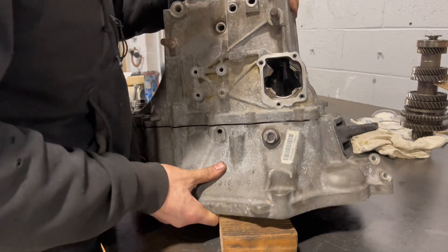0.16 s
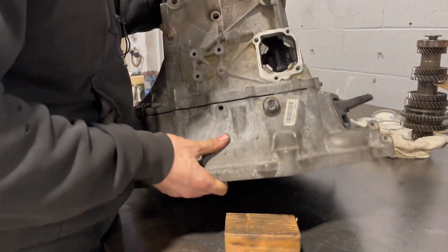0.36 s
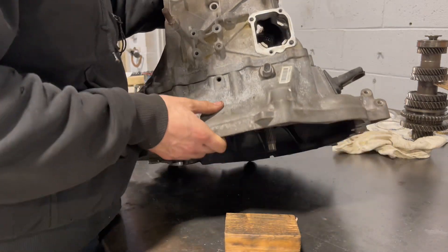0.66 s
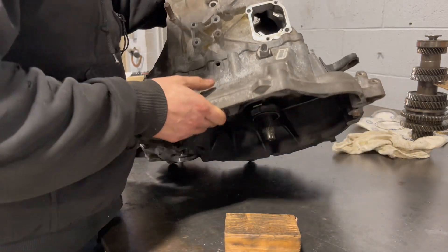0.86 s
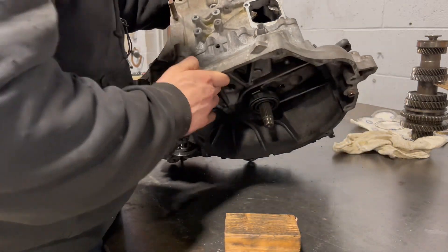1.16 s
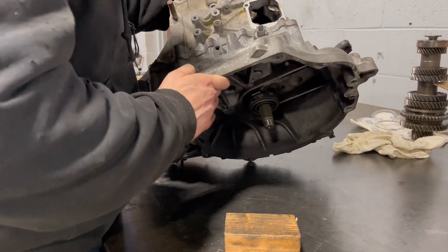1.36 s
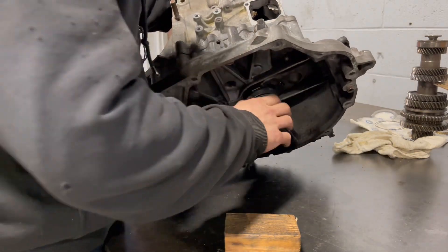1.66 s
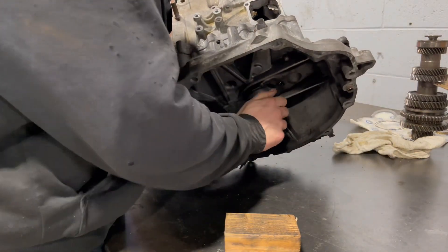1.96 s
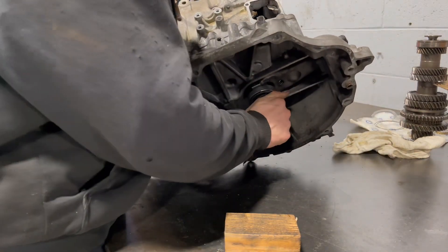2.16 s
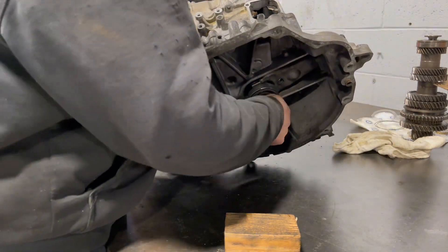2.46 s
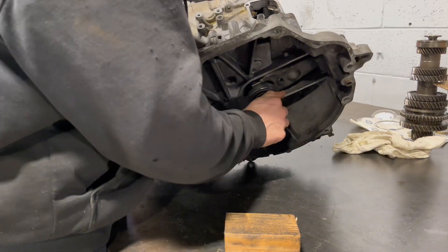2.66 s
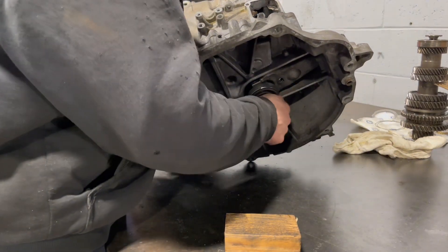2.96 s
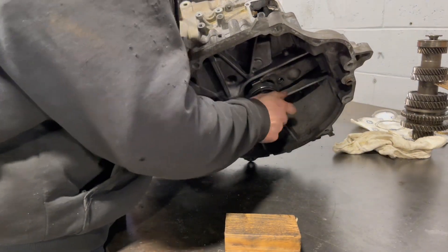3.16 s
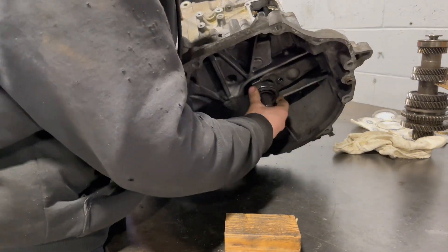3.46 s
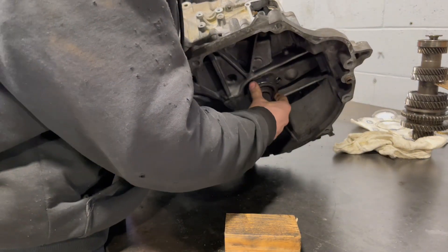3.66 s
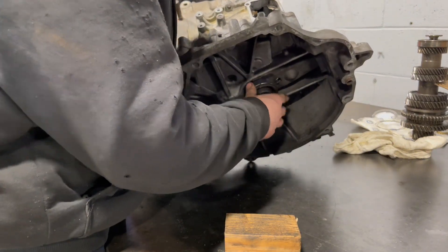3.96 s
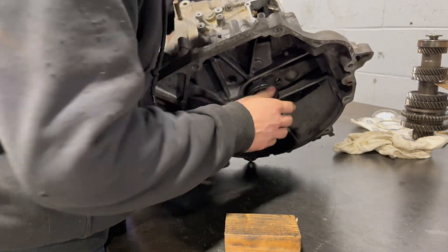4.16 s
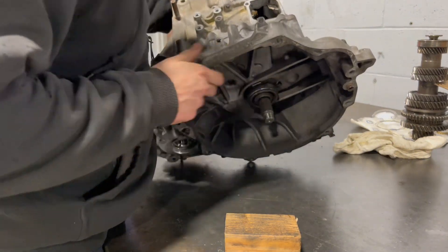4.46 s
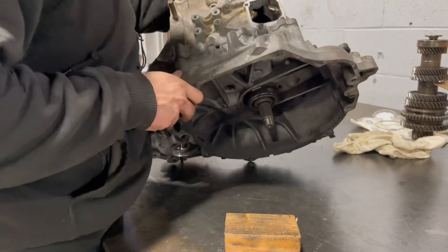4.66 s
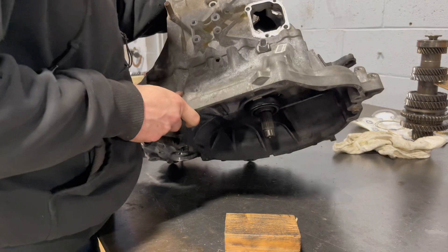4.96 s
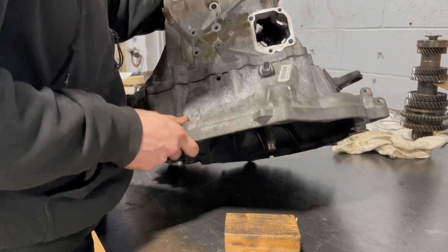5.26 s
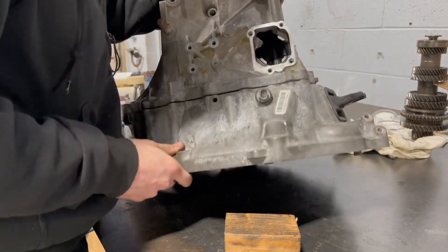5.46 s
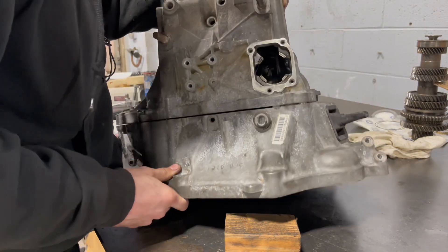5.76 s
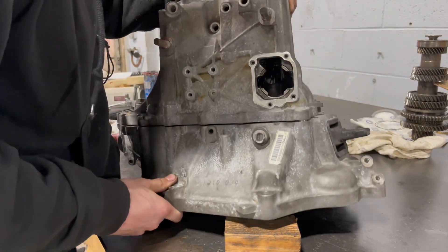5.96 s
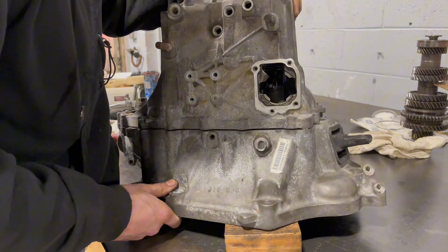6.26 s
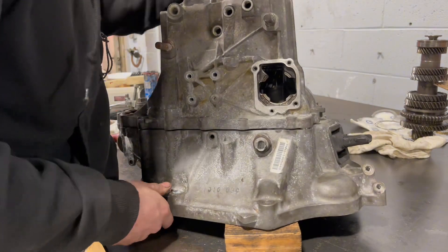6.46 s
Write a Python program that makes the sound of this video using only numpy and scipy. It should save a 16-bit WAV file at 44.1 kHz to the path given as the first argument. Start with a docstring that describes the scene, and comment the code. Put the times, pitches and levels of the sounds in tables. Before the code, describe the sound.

A heavy hollow metal casing thumps onto a bench, small gear clicks and a faint steel chink follow, then softer deep thuds as it is set back.

```python
"""A heavy cast gearbox case is tipped over on a steel workbench, and later tipped back onto a wooden block.
Each bump excites decaying modes of bench and shell and bursts of noise at the contact; rolling is rubbed modes.
In between a hand twists the input shaft: gears click as noise bursts, loose steel rings as shaft modes.
Sleeves rustle as grainy filtered noise; a workshop hums as steady noise and echoes through random decaying tails.
Two microphone ports hear it all."""
import sys
import numpy as np
from scipy import signal
from scipy.fft import rfft, irfft, next_fast_len
from scipy.io import wavfile
from scipy.ndimage import map_coordinates

SR = 44100
rng = np.random.default_rng(int(sys.argv[2]) if len(sys.argv) > 2 else 0)


def unload_wav(signal):
    """Save mono or channel-first audio to the path in sys.argv[1] as 16-bit WAV at rate SR, clipped to [-1, 1]."""
    wavfile.write(
        sys.argv[1],
        SR,
        np.round(np.clip(np.atleast_2d(signal).T, -1, 1) * 32767).astype(np.int16),
    )


N = 291501

# Bumps of the case: (time [s], boom, knock, clack and grit levels [dB], drive of the upper bench modes [dB])
BUMPS = [(0.101, -54, -52.5, -49, -68, 9), (0.151, -44, -61, -70, -77, -5), (.285, -42, -51, -36.5, -53, 4),
         (0.3, -42, -42, -46, -50, 2), (.31, -13, -25.5, -20, -33, 6), (.317, -15, -22, -25, -30, -5),
         (.324, -27.5, -21, -30.5, -37.5, -7), (.333, -27, -30.5, -30.5, -38, -2),
         (0.341, -20.5, -46, -30, -42, 5.5), (0.348, -33, -49, -34, -35, -9),
         (0.364, -25, -34, -37, -41.5, 7.5), (1.053, -24.5, -32, -43, -66, 1.5),
         (1.064, -34.5, -37.5, -54.5, -78, -3), (1.076, -30.5, -39.5, -54.5, -72, 2),
         (4.785, -27.5, -34, -43.5, -62, 1), (4.796, -35, -37, -54, -67, 0),
         (4.813, -33.5, -50.5, -56, -71, 1.5), (5.365, -53, -60.5, -65, -81.5, 2),
         (5.4, -41.5, -49.5, -65.5, -72, -1.5), (5.44, -46, -56.5, -62.5, -78, 4.5),
         (5.75, -38, -41.5, -36, -68.5, 1), (5.761, -17, -34.5, -52, -81.5, -1),
         (5.812, -40, -35, -43, -66, -3), (5.83, -27.5, -37.5, -49.5, -64.5, -6),
         (5.872, -33.5, -38, -57, -70, 3), (6.055, -38, -55, -36, -62, -8),
         (6.063, -37, -47, -36, -44.5, -5), (6.075, -15.5, -35, -33.5, -42, 2.5),
         (6.087, -38, -40, -55, -47.5, 15), (6.098, -37, -43, -59, -63, 3),
         (6.108, -18.5, -33.5, -41.5, -54, -0.5), (6.149, -25.5, -32.5, -41, -55, 1),
         (6.158, -37, -44, -60, -58, -6), (6.218, -26.5, -38.5, -54, -74, -11),
         (6.277, -20.5, -46, -43, -51, -7.5), (6.425, -26, -41, -53, -61, -4.5),
         (6.511, -26.5, -53, -48.5, -77, -7), (6.569, -22, -57, -59, -66, -5)]
# Modes of the steel bench top: (frequency [Hz], level [dB], decay by 60 dB [s])
BENCH_MODES = [(53.2, -5, 1), (67.96, 2.5, 0.6), (71.48, 1, 1), (102, -3.5, 0.53), (124, -11.5, 0.18),
               (143.5, -6, 0.39)]
# Modes of the cast shell: (frequency [Hz], level [dB], decay by 60 dB [s])
CASE_MODES = [(169.6, 3, 0.043), (212.5, 1, 0.083), (255.5, 1.5, 0.065), (293.4, 5, 0.052),
              (343, -0.5, 0.053), (393.5, -7.5, 0.13), (440, -6, 0.15), (302.2, -22.5, 0.67),
              (561, -23, 0.79), (620, -13, 0.053), (735, -13, 0.3), (810, -16, 0.2), (890, -16.5, 0.11),
              (1194, -25, .2), (1360, -24, .3), (1460, -25, .2), (1718, -21.5, .18), (1940, -24, .3),
              (2290, -27, .3), (2460, -22, 0.14)]
# Contact noise, from dull to bright: (frequency [Hz], spectral density [dB per Hz])
THUD_SPECTRUM = [(140, -25.5), (300, -2.5), (600, -3), (900, -7), (1400, -29.5), (3000, -72.5)]
CLACK_SPECTRUM = [(300, -28), (500, 0), (850, 5.5), (1300, 4), (1750, -4.5), (2500, -15), (3500, -29.5),
                  (6000, -70.5)]
GRIT_SPECTRUM = [(1180, -23.5), (2000, 3.5), (3500, -7.5), (7860, -18.5), (8540, -17), (10400, -16),
                 (11800, -19.5), (12300, -62.5), (16000, -96), (22000, -120)]
# The full weight lands in one low push: (time of its middle [s], peak level [dB], pitch [Hz])
LANDINGS = [(0.324, -11.5, 228), (.348, -21.5, 299), (5.764, -23, 169), (5.822, -26.5, 150),
            (5.876, -27.5, 169), (6.08, -16.5, 139), (6.108, -28, 189), (6.164, -19.5, 187),
            (6.233, -30.5, 192), (6.281, -28, 111)]
LANDING_CYCLES = 0.34  # standard deviation of the push's bell envelope, in cycles of its pitch
# Base contact length; it grows by SOFTER dB for each dB that the grit lies under the knock
CONTACT_S, SOFTER = 0.0092, 0.099
# Soft contacts spare the modes above 300 Hz: dB an octave for each dB that the grit lies under the knock
DULLER = 0.16
CHATTER_S, CHATTER_DB = 0.005936, -7.5  # the uneven rim touches twice more: mean gap [s], change a touch [dB]


def bumps():
    """Impact excitation: a blow starts bench and shell modes, and a softer contact lasts longer and duller."""
    tones, thud, clack, grit = np.zeros((4, N))
    bench = body(BENCH_MODES, attack=.009)  # the wide top is slow to start moving
    shell = body(CASE_MODES, attack=0.0016)
    octaves = np.log2(np.transpose(CASE_MODES)[0] / 300).clip(0)
    upper = np.transpose(BENCH_MODES)[0] > 85
    for s, boom_db, *_, upper_db in BUMPS:
        add(tones, s, amp(boom_db - 5.0) * bench(2.5, upper_db * upper))
    for s, loss_db, (_, knock_db, clack_db, grit_db, _) in rebounds(BUMPS, CHATTER_S, CHATTER_DB, count=2):
        length = CONTACT_S * amp(SOFTER * (knock_db - grit_db))
        dulling_db = DULLER * min(grit_db - knock_db, 0) * octaves
        add(tones, s, amp(knock_db + loss_db + 6) * shell(3, dulling_db))
        add(thud, s, amp(clack_db + loss_db - 6.0) * puff(7 * length, attack=0.0008))
        add(clack, s, amp(clack_db + loss_db - 1.0) * puff(3.78 * length, attack=0.00041))
        add(grit, s, amp(grit_db + loss_db) * puff(4 * length, attack=0.0004))
    for s, db, hz in LANDINGS:
        cycles = hz * np.arange(-SR // 50, SR // 50) / SR
        bell = np.exp(-(cycles / LANDING_CYCLES) ** 2 / 2)
        add(tones, s - 1 / 50, amp(db) * bell * np.cos(2 * np.pi * cycles))
    roughness = amp(2.0 * wobble(250))
    crunch = thud * noise(THUD_SPECTRUM)[0] + clack * noise(CLACK_SPECTRUM)[0] + grit * noise(GRIT_SPECTRUM)[0]
    return tones + roughness * crunch


# The case rocks and rolls on the bench: (start [s], length [s], boom level [dB], scrape level [dB])
DRAG = [(-.03, 0.079, -36.5, -47.5), (.1, 0.44, -56, -67.5), (2.52, 0.18, -75, -55),
        (2.72, 0.32, -88.5, -60), (5.3, 0.38, -64.5, -62), (6.14, 0.16, -48, -47.5),
        (6.28, 0.4, -43.5, -53.5), (6.4, 0.18, -58.5, -71), (6.48, 0.84, -39, -41)]
# Scraping noise: (frequency [Hz], spectral density [dB per Hz])
SCRAPE_SPECTRUM = [(90, -40.5), (150, -8), (220, -1), (300, 10.5), (400, -5.5), (800, -7.5), (1500, -17),
                   (3000, -54.5), (6000, -84.5)]
RUB_TOP_HZ = 200  # the rolling boom falls away above this frequency [Hz]
ROCK_RISE = 0.36  # share of a stroke spent swelling


def drag():
    """Sustained friction excitation: the rolling rim's uneven rubbing keeps bench and shell modes sounding."""
    boom, scrape = strokes(DRAG, ROCK_RISE)
    shell = signal.fftconvolve(rng.standard_normal(N), body(CASE_MODES, attack=.002)(1.5))[:N]

    def bench_response(f):
        width = 12  # Hz, of every resonance
        modes = sum(amp(db) * 1j * f * width / (c * c - f * f + 1j * f * width) for c, db, _ in BENCH_MODES)
        return modes / (1 + 1j * f / RUB_TOP_HZ) ** 2

    bench = unit(filtered(rng.standard_normal(N), bench_response))
    unevenness = amp(0.67 * wobble(30))
    return boom * bench + scrape * unevenness * (noise(SCRAPE_SPECTRUM)[0] + amp(-11.0) * unit(shell))


# Gear clicks: (time [s], strength [dB], brightness [dB re strength], weight [dB re strength])
CLICKS = [(2.054, -69.5, -9.5, -11.5), (2.252, -64.5, -19, -10), (2.309, -49.5, -10.5, -10),
          (2.474, -46, -22, -12), (2.491, -35.5, -19.5, -13.5), (2.501, -43, 0.5, -24),
          (2.569, -42, -32, -11), (2.667, -72.5, 1, 15), (2.731, -37.5, -14.5, -11),
          (2.765, -38.5, -6.5, -8), (3.007, -40, -21, -14.5), (3.041, -42.5, -3, -3.5),
          (3.512, -68, -9, 12), (3.55, -61.5, -15, 7.5), (3.62, -45.5, -11.5, -6.5),
          (3.996, -76, -3.5, -8.5), (4.59, -75.5, -5.5, -12.5), (4.832, -54.5, -7.5, -12.5),
          (4.912, -51.5, -16, -9), (5.067, -53, -19, -9), (5.098, -56.5, -10, -5.5),
          (6.27, -57.5, -26.5, 8.5)]
# Tick of the teeth and its brighter fizz: (frequency [Hz], spectral density [dB per Hz])
TEETH_SPECTRUM = [(900, -30), (1500, 8.5), (2600, 12), (4000, -5.5), (5000, -9), (7000, -73)]
FIZZ_SPECTRUM = [(3000, 0), (4500, 7.5), (7000, 4), (9000, -5), (11500, -7.5), (12400, -43)]
CLICK_S = .05  # time for tick and fizz to die by 60 dB
REBOUND_S, REBOUND_DB = 0.008, -12  # teeth rebound twice: mean gap [s], change a rebound [dB]


def clicks():
    """Backlash impact: teeth rattle across their play in short gritty bursts that also knock the shell."""
    tick, fizz, clack, knock = np.zeros((4, N))
    burst, shell = puff(CLICK_S, attack=0.00061), body(CASE_MODES, attack=0.0036)
    for s, loss_db, (db, bright_db, weight_db) in rebounds(CLICKS, REBOUND_S, REBOUND_DB, count=2):
        add(tick, s, amp(db + loss_db - 7.0) * burst)
        add(fizz, s, amp(db + loss_db + bright_db) * burst)
        add(clack, s, amp(db + loss_db + weight_db - 8.0) * puff(3.54 * CLICK_S, attack=0.0011))
        add(knock, s, amp(db + loss_db + weight_db + 7) * shell(3))
    roughness = amp(2.2 * wobble(400))
    bright = tick * noise(TEETH_SPECTRUM)[0] + fizz * noise(FIZZ_SPECTRUM)[0]
    return roughness * bright + clack * noise(CLACK_SPECTRUM)[0] + knock


# Steel parts chink: (time [s], levels [dB] of the short clank, of the rings near 2.5 kHz, near 3.1 kHz,
# and from 4.2 kHz up, added damping by hand or bench [dB/s])
CHINKS = [(3.527, -71, -74, -79, -85, 67), (3.548, -61, -57, -66, -64, 118),
          (3.575, -73, -58.5, -51, -74, 57), (3.621, -34, -61, -57, -80, 22),
          (3.683, -62.5, -81, -71, -103, -1.5), (5.833, -74, -62, -59, -56, 211),
          (6.277, -59, -50, -43, -46.5, 107), (6.451, -70, -56, -60, -55, 49),
          (6.566, -59, -70, -71, -64, 67)]
# Modes of the steel shaft: (frequency [Hz], level [dB], decay by 60 dB [s])
SHAFT_MODES = [(1900, -4, .025), (2500, 1, .035), (2510, -17, .55), (2545, -17, .6), (2700, -13, .12),
               (3068, -14, .6), (4220, -14, .36), (6900, -30, .06), (7600, -30, .06)]
# For each shaft mode: (which of the four levels drives it [index])
SHAFT_GROUP = [0, 0, 1, 1, 1, 2, 3, 3, 3]
# Steel grates on steel: (start [s], length [s], level [dB])
GRATE = [(3.5, 0.1, -64.5), (3.555, 0.075, -73)]
# Drive of the same four groups by grating: (level [dB])
GRATE_DRIVE = (-3, 5.5, -10.5, -3)
GRATE_RISE = 0.46  # share of the stroke spent swelling
JANGLE_S, JANGLE_DB = .009, -16  # the loose part touches twice more: mean gap [s], change a touch [dB]


def chinks():
    """Modal ringing: a touch sets the steel shaft ringing unevenly, and grating feeds it dense grains."""
    tones, shaft = np.zeros(N), body(SHAFT_MODES, attack=0.0005)
    for s, loss_db, (*dbs, damping) in rebounds(CHINKS, JANGLE_S, JANGLE_DB, count=2):
        sound = shaft(1.5, np.take(dbs, SHAFT_GROUP))
        add(tones, s, amp(loss_db - damping * np.arange(len(sound)) / SR) * sound)
    grains = unit(amp(7 * wobble(600)) * rng.standard_normal(N))
    sound = shaft(1.5, np.take(GRATE_DRIVE, SHAFT_GROUP))
    friction = strokes(GRATE, GRATE_RISE)[0] * grains
    grate = signal.fftconvolve(friction, sound / np.linalg.norm(sound))[:N]
    return (tones + grate) * amp(2.2 * wobble(70))


# Sleeves and hands slide: (start [s], length [s], rub level [dB], hiss level [dB])
RUSTLE = [(.08, 0.12, -111, -72.5), (.19, 0.14, -100, -70), (.24, 0.054, -83, -62.5),
          (.885, 0.2, -70.5, -80), (1.27, 0.21, -80.5, -89), (1.4, 0.28, -80, -84),
          (1.52, 0.57, -84.5, -73), (2.55, 0.16, -91, -100), (3.06, 0.2, -81, -79), (3.5, 0.1, -74, -81),
          (3.55, 0.14, -68.5, -80), (3.6, 0.056, -80, -103), (3.98, 0.62, -99, -86),
          (4.36, 0.26, -87, -84.5), (4.67, 0.42, -75.5, -75), (4.9, 0.92, -77, -83),
          (5.05, 0.084, -71, -86), (6.17, 0.61, -71, -70), (6.26, 0.042, -93, -93)]
# Low and high parts of the sliding noise: (frequency [Hz], spectral density [dB per Hz])
RUB_SPECTRUM = [(900, -20.5), (1800, -1.5), (2600, -4.5), (4500, -10), (7500, -16), (9000, -27.5)]
HISS_SPECTRUM = [(3820, -26.5), (6500, -18.5), (8580, -18.5), (9520, -5), (10500, -7), (11300, -8),
                 (12300, -47.5), (16000, -72), (22000, -120)]
SLIDE_RISE = 0.23  # share of a stroke spent swelling


def rustle():
    """Friction noise: cloth and skin slide in uneven grains."""
    rub, hiss = strokes(RUSTLE, SLIDE_RISE)
    grain = amp(0.5 * wobble(20) + 0.69 * wobble(260))
    low = rub * unit(grain * noise(RUB_SPECTRUM, channels=2))
    high = hiss * unit(grain * noise(HISS_SPECTRUM, channels=2))
    return spread(low + high)


# Likeness of close sounds at the two ports: (frequency [Hz], left-right correlation [1])
NEAR_ALIKE = [(50, .98), (350, 1), (550, 0.33), (1000, 0.21), (4000, 0.2), (7500, 0.13), (10000, .95)]


def nearby(x):
    """Partial coherence: bench and wall add a smeared copy, varying in time, that differs between the ports."""
    step, fade = 2048, puff(.008, attack=.0003)[:768]
    padded, copy = np.pad(x, (step, 2 * step)), np.zeros(N + SR)
    for start in range(0, N + step, step):
        smear = rng.standard_normal(len(fade)) * fade
        piece = padded[start:start + 2 * step] * signal.windows.hann(2 * step, sym=False)
        add(copy[start:], 0, signal.fftconvolve(piece, smear / np.linalg.norm(smear)))
    return spread(np.array([x, copy[step:step + N]]), NEAR_ALIKE)


# Reverberation time: (frequency [Hz], decay by 60 dB [s])
ROOM_DECAY = [(60, 1), (300, 1.054), (1500, 1.89), (2700, 1.4), (4000, 1.2), (6000, 1), (8000, 0.78),
              (12000, 1.75)]


def room(x):
    """Reverberation: each frequency dies at its own speed, with a new random tail every third of a second."""
    out, step = np.zeros((2, N + 2 * SR)), SR // 3
    x = np.pad(x, (0, SR))
    for start in range(0, N, step):
        # neighbouring pieces crossfade; the first starts at full level
        fade = np.interp(np.arange(step + 1024), [0, 1024, step, step + 1024], [start == 0, 1, 1, 0])
        hz, t, z = signal.stft(rng.standard_normal((2, SR)), SR, nperseg=256)
        decay = amp(-60 * t / along(ROOM_DECAY, hz)[:, None])
        tail = signal.istft(z * decay, SR, nperseg=256)[1][:, :SR]
        piece = x[start:start + len(fade)] * fade
        wet = signal.fftconvolve(piece[None], tail / np.linalg.norm(tail[0]), axes=1)
        out[:, start + 250:start + 250 + wet.shape[1]] += wet  # the echo begins 250 samples late
    return spread(out[:, :N])


# The building's drone and a faint steady hiss: (frequency [Hz], spectral density [dB per Hz])
HUM_SPECTRUM = [(15, -32), (25, 6), (101, -7.5), (180, -22.5), (326, -24), (366, -22.5), (392, -37.5),
                (420, -20.5), (450, -32), (1320, -29.5), (1700, -35.5), (2140, -47), (6000, -64),
                (7800, -68), (13200, -120)]
AIR_SPECTRUM = [(2500, -24.5), (5000, -6.5), (8000, -12), (10000, 2.5), (12000, -11.5), (12400, -24.5)]
HUM_DB, DRIFT_DB = -52.5, .8  # the drone's level and the scale of its slow unsteadiness


def hum():
    """Diffuse background noise: the building's low drone drifts slightly under a faint hiss."""
    drone = amp(HUM_DB + DRIFT_DB * wobble(2)) * spread(noise(HUM_SPECTRUM, channels=2))
    return drone + amp(-89.5) * spread(noise(AIR_SPECTRUM, channels=2))


def body(modes, attack):
    """Modal superposition: returns a function that plays one blow, each time at new mode strengths."""
    hz, db, t60 = np.transpose(modes)[:, :, None]
    t = np.arange(int(SR * t60.max() * 4 / 5)) / SR
    decay = amp(db - 60 * t / t60) * (1 - np.exp(-t / attack))
    waves = decay * np.sin(2 * np.pi * hz * t) / np.linalg.norm(amp(db))
    return lambda scatter_db, drive_db=0: amp(rng.normal(0, scatter_db, len(modes)) + drive_db) @ waves


def rebounds(rows, gap, loss_db, count):
    """Inelastic rebound: each event as (s, loss dB, row), then weaker contacts at uneven gaps."""
    gaps = gap * np.cumsum(rng.uniform(.7, 1.3, (len(rows), count)), axis=1)
    return [(row[0] + late, loss_db * k, row[1:])
            for row, own in zip(rows, gaps) for k, late in enumerate([0, *own])]


def strokes(rows, rise):
    """Amplitude envelope: one gain curve for each dB column, in which every stroke swells, then fades."""
    gains = np.zeros((N, len(rows[0]) - 2))
    for s, length, *dbs in rows:
        t = np.arange(max(s, 0), s + length, 1 / SR)
        swell = np.interp(t, [s, s + rise * length, s + length], [0, 1, 0])
        add(gains, t[0], np.outer(swell, amp(dbs)))
    return gains.T


def puff(length, attack):
    """Exponential decay: a quick rise and a fall by 60 dB over the length."""
    t = np.arange(SR // 4) / SR
    return amp(-60 * t / max(length, .002)) * (1 - np.exp(-t / attack))


def add(track, s, sound):
    """Linear superposition: mixes a sound into the track at time s."""
    part = track[round(s * SR):][:len(sound)]
    part += sound[:len(part)]


def noise(spectrum, channels=1):
    """Spectral shaping: white noise coloured by a density curve, at rms 1."""
    return unit(filtered(rng.standard_normal((channels, N)), lambda hz: amp(along(spectrum, hz))))


# Likeness of sound from all around at the two ports: (frequency [Hz], left-right correlation [1])
DIFFUSE_ALIKE = [(50, 0.97), (200, 0.94), (400, 0.21), (1000, 0.046), (4000, 0.02), (7500, 0.031),
                 (10000, 1)]


def spread(pair, alike=DIFFUSE_ALIKE):
    """Interchannel coherence: two unrelated signals mixed as sum and difference to a given likeness."""
    turn = lambda hz: np.arccos(np.clip(along(alike, hz), -1, 1)) / 2
    mid, side = filtered(pair, lambda hz: np.array([np.cos(turn(hz)), np.sin(turn(hz))]))
    return np.array([mid + side, mid - side])


def filtered(x, response):
    """Linear filtering: x times a complex response of frequency."""
    m = next_fast_len(N + SR)
    return irfft(rfft(x, m) * response(np.fft.rfftfreq(m, 1 / SR)), m)[..., :N]


def wobble(rate):
    """Random modulation: a smooth random curve, rate knots a second."""
    return map_coordinates(rng.standard_normal(int(N * rate / SR) + 4), [np.arange(N) * rate / SR])


def along(points, hz):
    """Logarithmic frequency scale: interpolates (Hz, value) points on a log axis."""
    f, v = np.transpose(points)
    return np.interp(np.log(hz + 1), np.log(f + 1), v)


def unit(x):
    """Power normalisation: x scaled to rms 1."""
    return x / np.sqrt(np.mean(x ** 2) + 1e-20)


def amp(db):
    """Logarithmic level: decibels to gain."""
    return 10 ** (np.asarray(db) / 20)


# Share sent back by the walls: (frequency [Hz], level [dB])
WALLS = [(60, -8.5), (200, -4), (600, -10.5), (1200, -10), (2200, -8), (4000, -7.5), (7000, -6.5),
         (12000, -20.5)]
PORTS = 11 / 44100  # s by which the left port hears later
TOP_HZ = 12450  # band limit of the microphone


def scene():
    """Direct and reverberant fields: the case stands a little right; the shaft end faces both ports at once."""
    heavy, light, steel = bumps() + drag(), clicks(), chinks()
    direct = nearby(heavy) * amp([[-1.1], [1.1]]) + nearby(light) * amp([[.3], [-.3]])
    # an opposite shift, so that the steel reaches both ports together
    direct += filtered(steel, lambda hz: np.exp(1j * np.pi * PORTS * hz * [[1], [-1]]))
    sent = heavy + amp(-4.5) * light + amp(-9.0) * steel
    echo = room(filtered(sent, lambda hz: amp(along(WALLS, hz))))
    return direct + echo + rustle() + hum()


def record(dry):
    """Interport delay and band limiting: the left port hears later; deep bass and the top are cut."""
    delay = lambda hz: np.exp(-1j * np.pi * PORTS * hz * [[1], [-1]])
    bass = lambda hz: (1j * hz / (1j * hz + 34)) ** 5
    return filtered(dry, lambda hz: delay(hz) * bass(hz) * (hz < TOP_HZ))


dry = scene()
out = record(dry)
unload_wav(out)
```